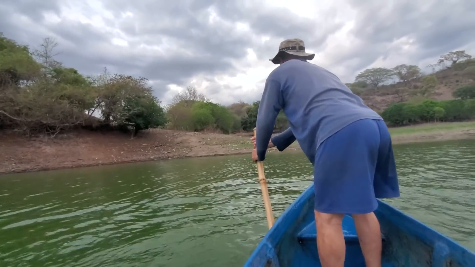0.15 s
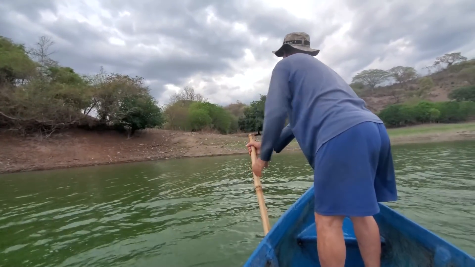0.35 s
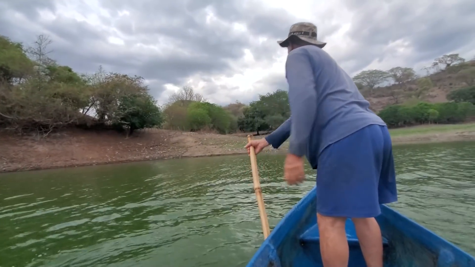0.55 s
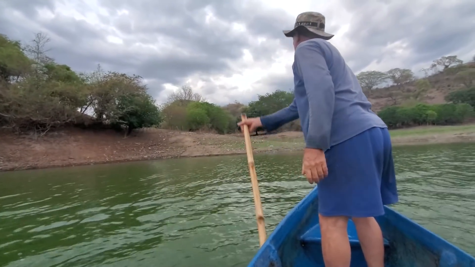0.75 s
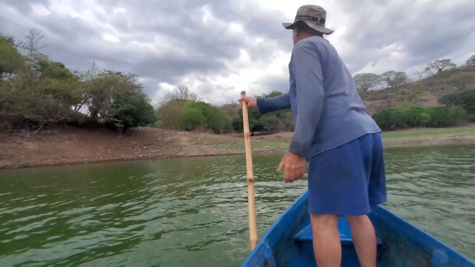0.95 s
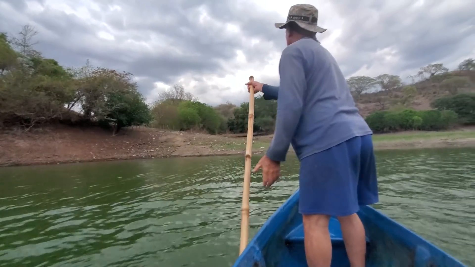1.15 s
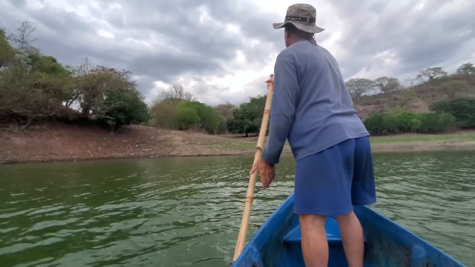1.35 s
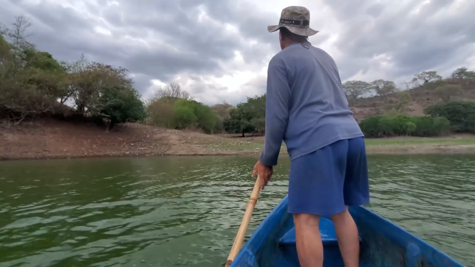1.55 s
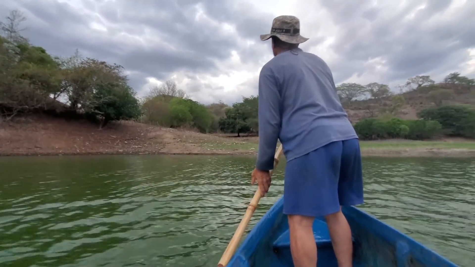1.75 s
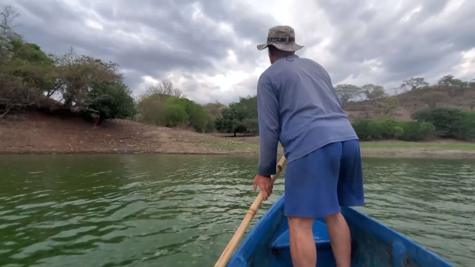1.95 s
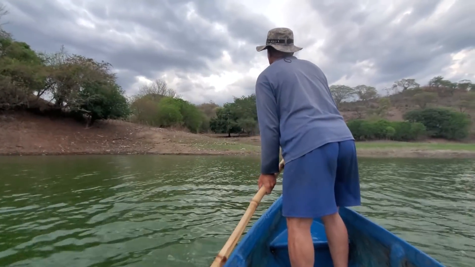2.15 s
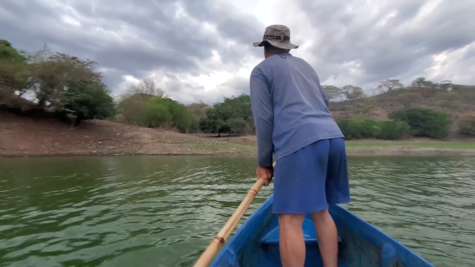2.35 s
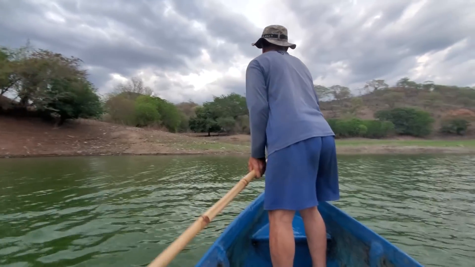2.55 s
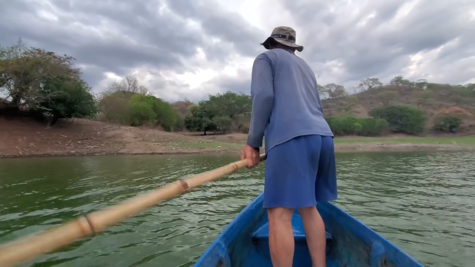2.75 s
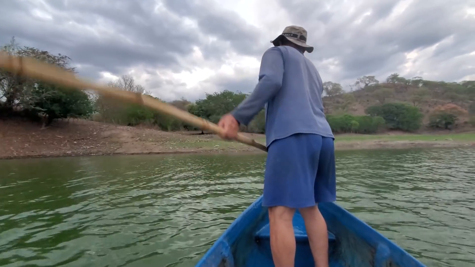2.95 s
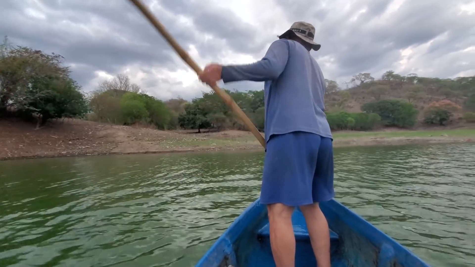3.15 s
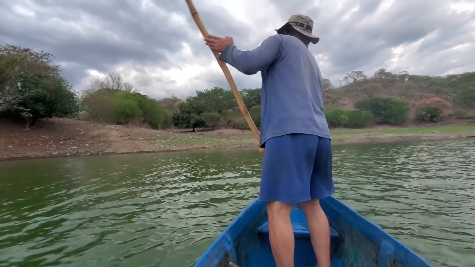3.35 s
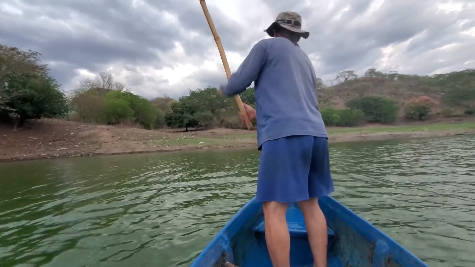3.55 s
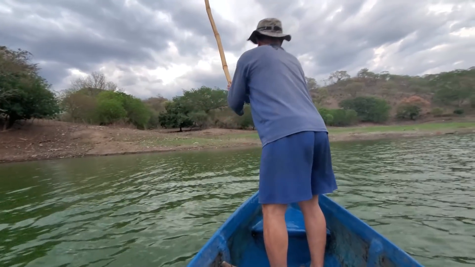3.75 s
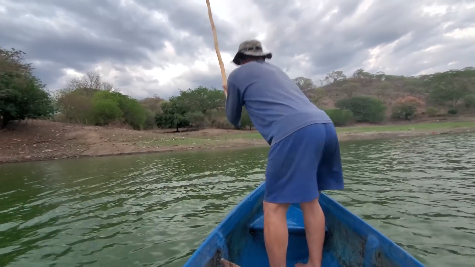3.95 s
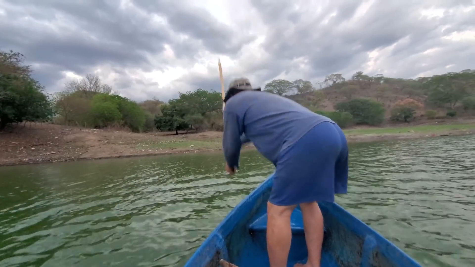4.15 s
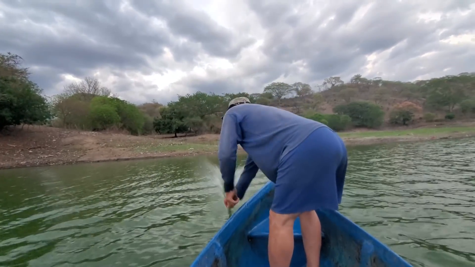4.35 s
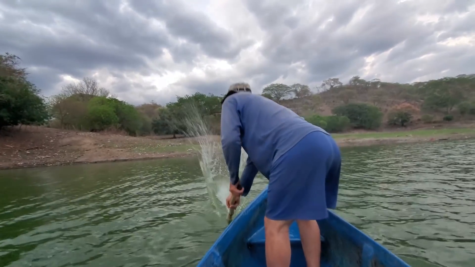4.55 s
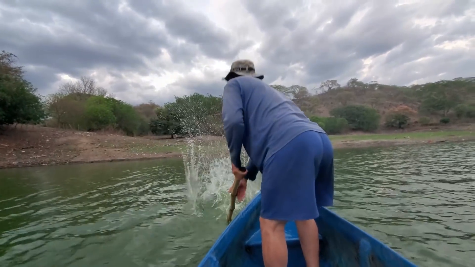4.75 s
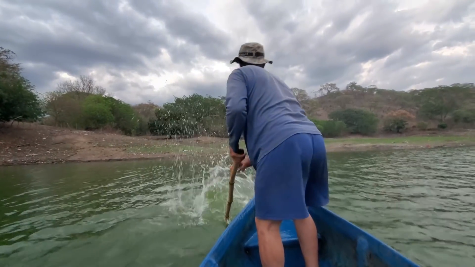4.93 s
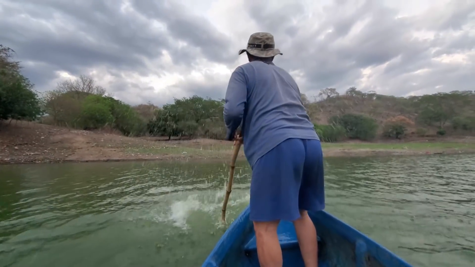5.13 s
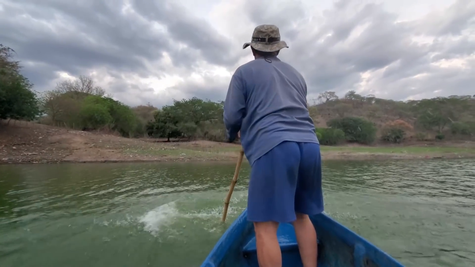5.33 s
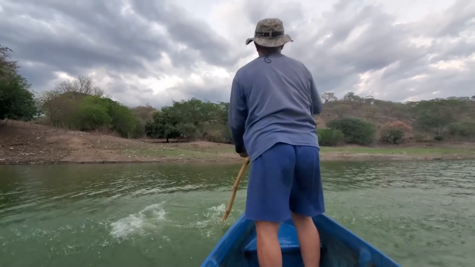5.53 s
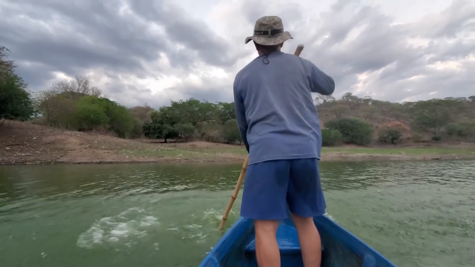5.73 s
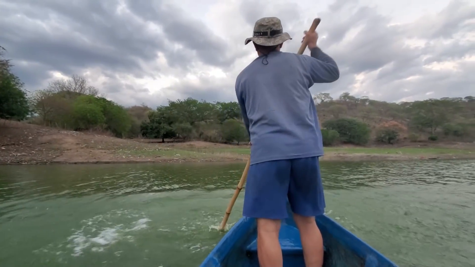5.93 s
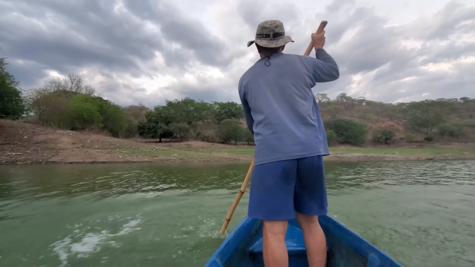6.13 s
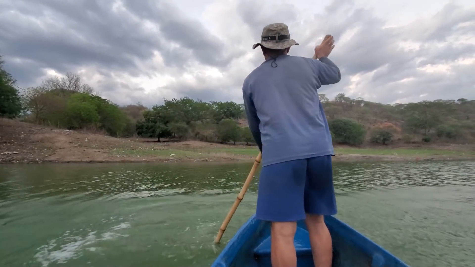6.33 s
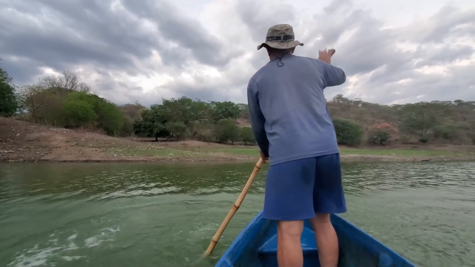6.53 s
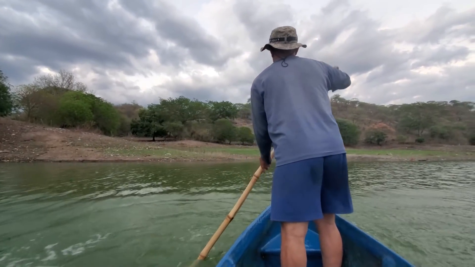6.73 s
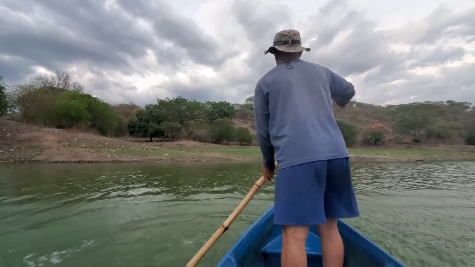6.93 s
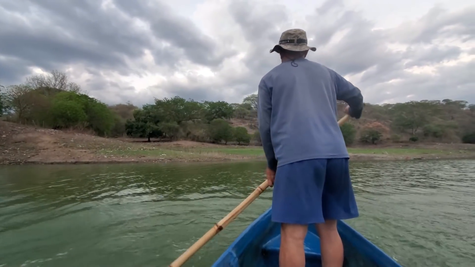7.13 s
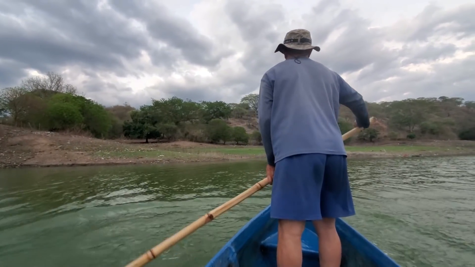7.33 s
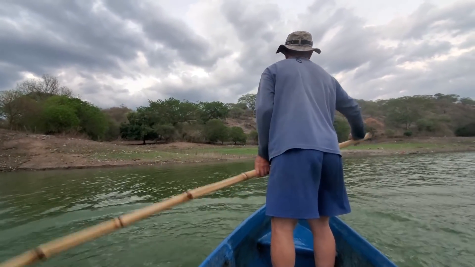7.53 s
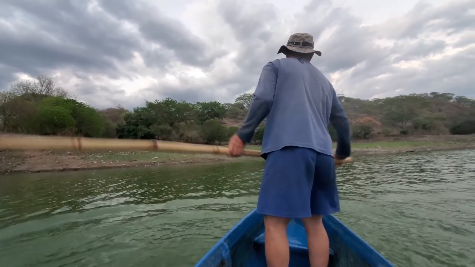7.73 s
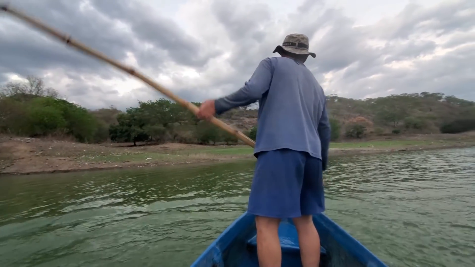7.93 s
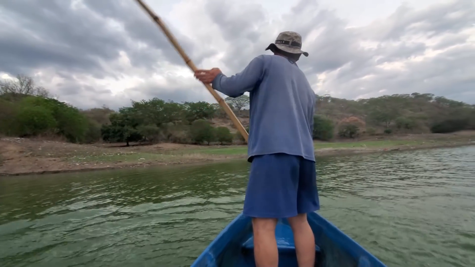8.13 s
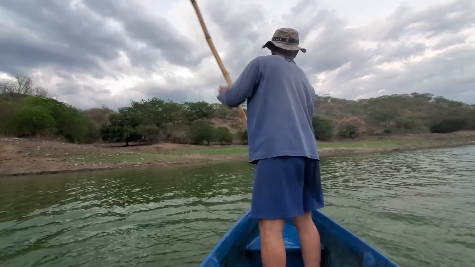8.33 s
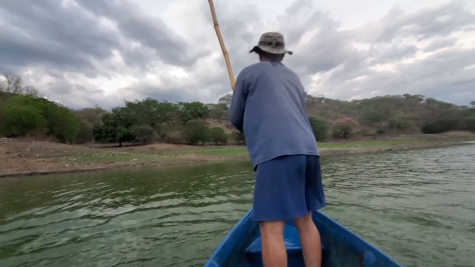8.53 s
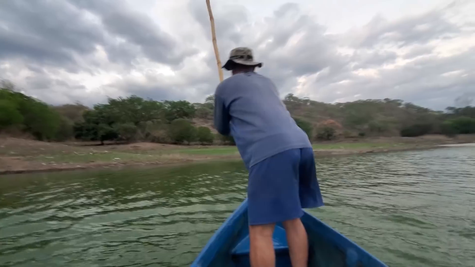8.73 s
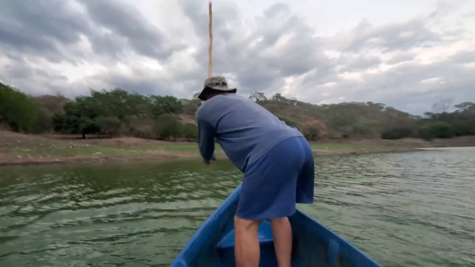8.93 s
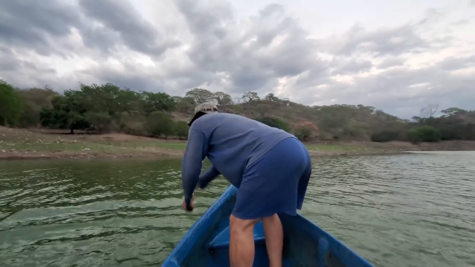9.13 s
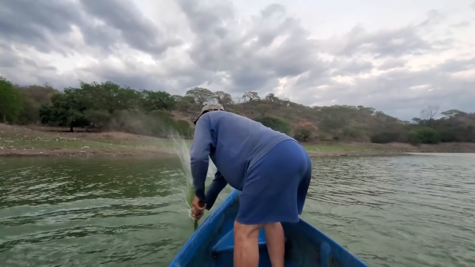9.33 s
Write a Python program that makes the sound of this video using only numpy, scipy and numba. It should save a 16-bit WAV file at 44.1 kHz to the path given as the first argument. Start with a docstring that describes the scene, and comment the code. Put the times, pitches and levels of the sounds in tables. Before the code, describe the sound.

Outdoors, near the bow of a boat: hollow knocks and short rasping scrapes first, then a gush of water running off a lifted pole, thinning to drips. A loud flat smack hits the water, a low plop follows, and a shower of droplets falls ahead. Quiet lapping, brief low wind buffets and another streaming lift lead to a final smack. Thin insect hiss and a faint whine lie beneath.

```python
"""A long bamboo pole, swung by a man in the bow of a small boat, beats the water of a lake.
It bumps and scrapes along the hull as damped modes, comes out streaming as a cloud of ringing bubbles,
and slaps down: a modal crack, the falling pitch and gulp of the cavity, then a shower of bubbles.
Wavelets cluck at the boat as tone bursts with trapped air; insects and wind are coloured noise,
a distant bird and a thin whine are gliding sines."""
import sys
import numpy as np
from scipy import signal
from scipy.fft import rfft, irfft, next_fast_len
from scipy.io import wavfile
from scipy.ndimage import uniform_filter1d
from numba import njit

SR = 44100
rng = np.random.default_rng(int(sys.argv[2]) if len(sys.argv) > 2 else 0)


def bounce(signal):
    """Save signal as a 16-bit WAV file at the path given by the first command-line argument."""
    frames = np.transpose(np.atleast_2d(signal))
    limited = np.clip(frames, -1, 1)
    pcm = np.round(limited * 32767).astype(np.int16)
    wavfile.write(sys.argv[1], SR, pcm)


N = 413658
TIME = np.arange(N) / SR   # t/s
EDGES = np.geomspace(45, 16000, 23)   # band limits f/Hz
BANK = [(low, high, signal.butter(2, [low, high], "band", fs=SR, output="sos"))
        for low, high in zip(EDGES, EDGES[1:])]

# likeness of diffuse sound at left and right: [f/Hz, correlation]
LIKENESS = [(40, 1), (130, 0.97), (600, 0.75), (1400, 0.26), (3000, 0.044), (16000, 0.46)]
# likeness of falling water at left and right: [f/Hz, shared fraction of power]
WATER_LIKENESS = [(500, 1), (1500, 0.97), (2500, 0.75), (4500, 0.15), (12000, 0.23)]

# insects on the shore: [t/s, level/dB]
INSECTS = [(0, -45.5), (1.2, -45), (2.4, -47), (3.8, -47.5), (4.6, -50), (6.3, -57), (6.9, -59),
           (7.3, -54.5), (8.0, -53), (8.6, -53.5), (9.38, -52.5)]
# spectrum of the insects: [f/Hz, level/dB]
INSECT_COLOUR = [(4400, -88), (5300, -17), (6200, -1.5), (7200, -2.5), (7800, 4), (8500, 0), (9700, 2.5),
                 (10800, -7), (13000, -10), (15500, -17)]
# one insect sings out in a narrow band
SINGER_S, SINGER_HOLD_S, SINGER_DB, SINGER_HZ = 7.12, 0.29, -57, 9100
# spectrum of still air: [f/Hz, level/dB]
AIR_COLOUR = [(25, -37), (50, 11.5), (100, -1), (220, -8.5), (550, -2), (1000, -8), (1400, 4), (2100, -9),
              (3500, -11), (5000, -14), (12000, -11), (16000, -8)]
# gusts on the microphone: [t/s at full strength, hold/s, level/dB]
GUSTS = [(5.66, 0.01, -36.5), (6.003, 0.023, -38.5), (8.71, 0.015, -45), (8.82, 0.025, -30),
         (9.045, 0.31, -36)]
# spectrum of the gusts: [f/Hz, level/dB]
GUST_COLOUR = [(20, 8.5), (45, 20), (90, 15.5), (130, -6), (190, -15), (400, -41.5)]
GUST_RISE_DB_PER_S, GUST_FALL_DB_PER_S = 245, 156

# mean pitch of a thin whine: [t/s, f/Hz]
WHINE_PITCH = [(0, 1725), (2.4, 1720), (4, 1685), (6.6, 1691), (9.38, 1680)]
WHINE_DB, WHINE_HISS_DB, WHINE_WANDER_HZ = -61.5, -61.5, 7

# loudest clucks at the hull and under the pole:
# [t/s, level/dB before a 7.5 dB cut, f/Hz, left minus right level/dB, left lead/ms, pat re bubble level/dB]
LAPS = [(0.131, -32, 1616, -5, -0.013, 0), (0.185, -35.5, 2230, -7, -0.15, 4),
        (0.247, -37, 1850, -19, -.1, -4), (0.29, -41, 1260, -5, -0.18, -3),
        (0.49, -31, 684, -4, -0.11, 7.5), (0.535, -39, 525, -1, -0.5, 11),
        (2.523, -39, 2790, 13, 0.32, -15), (2.607, -31, 1010, 0, 0.18, 8),
        (2.621, -21.5, 1360, -5, 0.37, -1), (2.676, -22, 2260, -2, 0.36, -17),
        (2.697, -23, 2550, -3, 0.48, 2), (2.716, -24, 3940, 9, .38, -3), (2.727, -19.5, 2220, -3, 0.33, -7),
        (2.741, -22.5, 2430, -2, 0.31, 4), (2.852, -25, 2650, -1, 0.42, 0),
        (2.92, -26.5, 1370, -1, 0.27, -7), (3.109, -36, 2680, -1, 0.36, -17),
        (3.171, -31, 2600, -3, .37, -18), (3.379, -34.5, 800, -17, -0.26, 1),
        (3.441, -33.5, 1580, -8, -0.47, 4), (3.591, -36.5, 1690, -7, -0.18, 9),
        (3.885, -29, 1825, -7, -0.11, -6), (3.97, -43, 1550, -7, -0.11, 2),
        (4.08, -49, 1000, -10, -0.058, 5), (4.137, -45, 1750, -5, -0.021, -3),
        (4.163, -49, 2420, -3, -.1, -6), (4.478, -20, 1340, -1, -0.0097, -2),
        (4.504, -28, 914, -3, -0.022, 0), (4.522, -30, 1390, -5, -0.037, -8),
        (4.541, -28, 1133, 0, -0.045, -4), (4.587, -34, 880, -1, 0, 5), (4.706, -34, 1380, 1, 0.052, -3),
        (4.74, -35.5, 1900, -2, 0.057, -5), (4.956, -20, 1110, -4, -0.0078, -7),
        (5.638, -38, 1920, -9, 0.33, 6), (5.81, -45, 1470, -4, .1, -6), (5.876, -33.5, 1460, -6, 0.12, 14),
        (6.02, -35, 1510, -13, 0.18, -4), (6.037, -30.5, 740, -3, 0.1, 11),
        (6.315, -32.5, 1310, -2, -0.12, -3), (6.373, -36.5, 1660, -5, -0.09, -7),
        (6.625, -42.5, 880, -3, -0.18, 6), (6.679, -43, 1190, -4, -0.3, -5),
        (6.703, -31.5, 1510, -15, -0.4, -4), (6.777, -35.5, 870, -6, -0.11, 5),
        (6.854, -36, 620, -5, -0.4, 4), (6.855, -33, 2370, -3, -0.12, -5),
        (7.103, -36, 507, -5, -0.051, 12), (7.195, -36, 1640, -4, 0.11, -5), (7.26, -38, 520, -4, 0.19, -7),
        (7.3, -39, 2580, 5, 0.29, 0), (7.352, -30, 960, -6, 0.28, 2), (7.443, -28.5, 1216, -9, 0.26, -5),
        (7.475, -25, 1960, -5, 0.23, 5), (7.713, -26.5, 2030, -6, 0.31, -16),
        (7.787, -28, 1860, -7, 0.4, -16), (7.869, -27, 1750, -6, 0.42, -15),
        (7.910, -29, 2400, -3, 0.54, -9), (8.097, -34, 2225, -5, .44, -16),
        (8.219, -29.5, 1880, -5, 0.4, -5), (8.292, -29.5, 2610, 4, 0.45, -28),
        (8.456, -33.5, 1196, -1, 0.15, -7), (8.968, -33, 776, -4, -0.15, -1)]
# spectrum of a pat, before it is narrowed around the pitch: [f/Hz, level/dB]
LAP_COLOUR = [(100, -33), (300, -23), (600, -1.5), (1000, -4.5), (1400, 4.5), (2300, -3.5), (3300, -21),
              (6000, -7), (16000, -44)]
# decay of a pat: [f/Hz, T60/s]
LAP_T60 = [(300, 0.16), (700, 0.34), (1500, 0.092), (3000, 0.19), (10000, .03)]
# the boat rocks, and smaller wavelets come by chance, from the right: [start t/s, end t/s]
ROCKING = [(0.081, 0.42), (2.25, 3.2), (3.401, 4.3), (6.45, 9), (6.999, 7.42), (8.1, 9.0)]
RIPPLE_DB, RIPPLE_SPREAD_DB, RIPPLE_PAT_DB = -42, 1.5, 0.5   # the first before the same 7.5 dB cut
RIPPLE_PAN_DB, RIPPLE_LEAD_MS, RIPPLE_LOW_HZ, RIPPLE_HIGH_HZ = -13, -0.28, 500, 2430

# big air pockets: [t/s, level/dB, start f/Hz, T60/s, glide/(octaves per s), left lead/ms]
POCKETS = [(0.374, -52, 590, 0.08, -0.5, -0.3), (0.442, -48.5, 494, 0.11, 13.5, -0.26),
           (0.54, -41.5, 506, 0.093, 2, -0.035), (2.575, -44, 760, 0.058, 17, 0.16),
           (2.785, -31, 594, 0.18, 7, 0.41), (2.85, -39.5, 602, 0.088, 5, 0.33),
           (2.987, -38.5, 870, 0.099, 3, 0.27), (3.044, -40, 924, 0.053, 6, 0.22),
           (3.184, -46, 650, 0.089, 2, .27), (3.378, -37, 615, 0.031, 17, -0.27),
           (3.455, -43, 656, 0.053, 11, -0.3), (3.484, -47, 755, 0.099, 6, -0.16),
           (3.671, -44.5, 621, 0.22, 7.5, 0), (3.755, -47, 525, 0.11, 7.5, 0.19),
           (4.175, -42, 234, 0.16, 32, 0), (4.491, -29.5, 468, 0.026, 10, 0.067),
           (4.498, -15.5, 108.6, 0.13, 2, 0.073), (4.526, -32, 148, 0.055, 4.5, -0.088),
           (4.528, -27.5, 217, 0.084, 0, -0.041), (4.541, -36, 337, 0.074, -2, 0),
           (4.561, -43, 129, 0.24, -3.5, -0.045), (4.753, -35, 194, 0.085, 4.5, 0.054),
           (5.062, -31, 660, 0.096, 26, 0.025), (5.642, -38, 786, 0.09, 3, 0.085),
           (6.532, -50, 562, 0.19, -4, -0.04), (6.622, -47.5, 610, 0.081, 11.5, 0),
           (6.905, -38.5, 764, 0.044, 12, -0.24), (7.01, -42.5, 484, 0.094, -2, 0),
           (7.048, -43, 459, 0.2, 1, 0.14), (7.378, -35, 780, 0.088, 30.5, 0.24),
           (7.458, -34, 759, 0.061, 38.5, 0.16), (7.492, -35.5, 767, .08, 15, 0.039),
           (7.525, -37, 660, 0.079, 5, 0.2), (7.612, -42.5, 409, 0.2, 4.5, 0.34),
           (7.632, -33, 754, 0.12, 2, .3), (7.66, -35, 655, 0.11, 3, 0.4),
           (7.693, -35, 634, 0.043, -1, 0.37), (8.0, -42, 720, 0.047, 6, 0.36),
           (8.071, -46.5, 323, 0.22, 23, -.1), (8.398, -43, 311, 0.17, 2, 0),
           (8.435, -47.5, 455, 0.078, 5, -.1), (8.472, -46.5, 326, 0.12, -1, 0),
           (8.49, -46, 620, 0.11, 8, -0.059)]
# the further a pocket glides, the more slowly it swells
POCKET_SWELL_S, SWELL_S_PER_OCTAVE = 0.0019, 0.0016

# pole and feet bumping the hull: [t/s, level/dB, treble re bass level/dB, ring length factor]
KNOCKS = [(0.7039, -15, 16, 0.96), (0.7105, -21, 6, 1.6), (0.731, -23, -9, 0.8), (0.7698, -21.5, 19, 1.3),
          (0.791, -22.5, 0, 0.7), (0.846, -30.5, -36, 1.1), (1.008, -24.5, -12, 0.87),
          (1.0303, -15, 3, 0.83), (1.0362, -18, -5.5, 0.91), (1.062, -30.5, -17, 1.1),
          (1.447, -37.5, -4, 1.26), (2.024, -30.5, -8, 1.64), (2.169, -33.5, -6.5, 1.43),
          (4.722, -36.5, 4, 2.8), (6.7034, -40.5, 25, 0.16), (7.493, -54, -22, 1.1), (8.199, -40, -1, 0.59),
          (8.2181, -36, 5, 0.96)]
# spectrum of a bump, before its treble tilt: [f/Hz, level/dB]
KNOCK_COLOUR = [(26, -35), (45, -5), (70, 2.5), (226, -0.5), (321, -4.5), (369, 12), (455, -9), (488, -6),
                (536, -7), (855, -10.5), (1110, -17), (1720, -17.5), (3910, -48.5), (7880, -51),
                (12000, -52), (15600, -89), (22000, -120)]
# decay of a bump, before its length factor: [f/Hz, T60/s]
KNOCK_T60 = [(70, 0.4), (200, 0.13), (500, 0.27), (1200, 0.15), (3000, 0.072), (10000, 0.14)]
# modes of the bamboo tube: [f/Hz, bandwidth/Hz, level/dB]
RASP_MODES = [(713, 91, 3), (1353, 150, 1.5), (1845, 166, -3), (2840, 660, -15), (5220, 580, -12.5)]
# modes of the hull: [f/Hz, level/dB, T60/s]
HULL_MODES = [(87.2, -4, 0.36), (120.7, -1.5, 0.31), (169.4, 1.5, 0.2), (225.6, -2, 0.29),
              (270.5, -4.5, 0.41), (356.3, -1.5, 0.24), (406.5, -5.5, 0.18), (486, -5.5, 0.14),
              (696, 4.5, 0.086), (1124, -7, 0.11), (1334, 0, 0.058), (1585, 8.5, 0.065), (1690, 7.5, 0.055),
              (2000, 4, 0.078), (2900, -4, 0.028)]
# a bump rings the hull mostly below the first (shifted by its tilt), a slap above the second
KNOCK_SOFT_HZ, SLAP_THIN_HZ = 795, 457

# the pole slides along the side: [t/s at full strength, hold/s, hull rumble level/dB, rasp level/dB]
SCRAPES = [(0.767, 0.19, -48.5, -39.5), (1.106, 0.062, -45.5, -42), (1.265, 0.026, -50, -46),
           (1.386, 0.06, -56, -60.5), (1.728, 0.14, -42.5, -56)]
# spectrum of the hull's rumble: [f/Hz, level/dB]
RUMBLE_COLOUR = [(26, -34), (45, -6), (124, 1), (264, -2.5), (303, -5.5), (390, -2.5), (485, -12.5),
                 (700, -6.5), (910, -26), (1540, -120)]
SCRAPE_RISE_DB_PER_S, SCRAPE_FALL_DB_PER_S = 276, 94

# the pole lifts out and water streams off it; levels before a common 2 dB cut: [t/s, length/s,
# gurgle level/dB, bubble level/dB, spray level/dB, hold factor, left lead/ms, left minus right level/dB]
LIFTS = [(2.6, .83, -36.5, -39.5, -38, 1.39, 0.342, 2.5), (7.48, .75, -35.5, -39.5, -39, 1.48, 0.398, 2.5)]
# course of gurgle, bubbles, spray (a row each): [delay/s, hold/s before the hold factor, rise/(dB/s), fade/(dB/s)]
STREAM_COURSE = [(.005, 0.09, 65, 53), (0.015, 0.202, 147, 30), (0.016, .33, 150, 29.5)]
# spectrum of the streaming water: [f/Hz, level/dB]
STREAM_COLOUR = [(88, -57), (150, -21), (240, -19), (341, -14.5), (524, -22), (790, -0.5), (950, -8.5),
                 (1200, 3), (1450, 3.5), (1750, 5.5), (2300, 2), (3620, -4), (7040, -9), (15100, -5.5),
                 (16000, -15)]
DRIPS_PER_S, STREAM_FOAM_DB = 2600, 2   # nominal rate, scaled by flow and drop size
ONSET_DB_PER_S, DRY_UP_DB_PER_S = 240, 38   # how fast a fall of water sets in and stops

# thin trickles as the pole goes in, turns, starts to rise and drains:
# [t/s at full strength, hold/s, level/dB, rise/(dB/s)]
TRICKLES = [(2.614, 0.024, -52, 127), (3.234, 0.26, -51.5, 90), (4.38, 0.26, -53.5, 300),
            (5.907, 0.22, -49, 73), (6.707, 0.26, -59, 120), (7.437, 0.038, -43, 72), (8.07, 0.27, -56, 90)]
TRICKLE_FALL_DB_PER_S = 112

# single drops landing close by: [t/s, level/dB before a 7.5 dB cut, centre f/Hz]
DROPS = [(2.718, -24.5, 9800), (2.7808, -30, 13000), (2.8353, -27, 9300), (3.2192, -31, 9350),
         (3.3181, -34, 12000), (3.4687, -30.5, 8200), (3.5411, -39, 9270), (4.9615, -20.5, 11800),
         (5.2326, -22.5, 9100), (5.4156, -29, 3920), (5.5977, -28, 13300), (5.6391, -29, 3650),
         (5.668, -26, 12400), (5.7089, -26, 13500), (5.7398, -32, 13000), (5.763, -32, 12100),
         (5.7832, -32, 13600), (5.826, -31, 12300), (5.887, -28, 12000), (5.901, -34, 12500),
         (5.9484, -43, 12600), (5.9923, -32.5, 13600), (6.3225, -40, 10100), (6.49, -41, 5000),
         (6.812, -35, 11400), (7.418, -34, 11200), (7.4754, -38, 11500), (7.4916, -17.5, 10400),
         (7.5842, -41, 12500), (7.6765, -30, 10500), (7.9858, -30.5, 9570), (8.2212, -35, 13500),
         (8.293, -29.5, 13000), (8.5315, -43, 9500), (8.884, -36, 6800)]

# eddies churning round the submerged pole: [t/s at their height, level/dB]
SWIRLS = [(3.85, -62.5), (4.15, -65.5), (5.29, -40.5), (7.119, -54.5), (7.329, -55), (7.62, -65),
          (7.93, -63)]
# spectrum of the large bubbles in the eddies: [f/Hz, level/dB]
SWIRL_COLOUR = [(100, -4), (160, 9), (220, -5.5), (330, 7.5), (450, 0.5)]
SWIRL_RISE_DB_PER_S, SWIRL_FALL_DB_PER_S = 68, 68

# a bird far off on the shore: [t/s, length/s, highest f/Hz, level/dB]
WHISTLES = [(3.93, 0.29, 2670, -72.5), (8.614, 0.25, 2650, -73)]

# pole slapping the lake: [t/s, level/dB, trapped air f/Hz, left lead/ms]
SLAPS = [(4.3405, -17, 3000, 0.058), (4.3425, -9.5, 1360, .1), (4.3432, -17, 740, 0.042),
         (9.2446, -9, 815, 0.18), (9.2490, -13.5, 1780, 0.19)]
# spectrum of the slap: [f/Hz, level/dB]
SLAP_COLOUR = [(59, -32), (100, 0), (416, -20), (482, -18), (570, -42), (718, 3.5), (1050, -13), (1290, 1),
               (1460, 14), (1730, -2), (2750, -23.5), (3390, -12.5), (9260, -29), (11900, -18),
               (15000, -53)]
# decay of the slap: [f/Hz, T60/s]
SLAP_T60 = [(150, 0.026), (600, 0.1), (1300, 0.056), (3000, 0.081), (6000, 0.067), (12000, 0.16)]
SLAP_PAN_DB = -5   # left minus right
# the cavity behind the pole closes: [t/s, level/dB]
GULPS = [(4.470, -27), (9.369, -31)]
# spectrum of the gulp: [f/Hz, level/dB]
GULP_COLOUR = [(180, -1.5), (300, -16), (507, 2), (669, -12), (884, -16), (1330, -1.5), (1760, -14),
               (1970, -6), (2170, -20), (2820, -19), (4690, -18), (6620, -36), (15000, -28)]
GULP_SPIT_DB = -40   # a little spray follows, swelling more slowly
REBOUND_S, REBOUND_LOSS_DB = 0.032, 6.5   # the cavity walls meet again and again, weaker each time
# the slap opens a hollow in the water: [t/s, level/dB, start f/Hz, T60/s]
CAVITIES = [(4.343, -28, 832, 0.16), (9.245, -25.5, 686, 0.19)]
CAVITY_OPEN_HZ, CAVITY_WIDENS_S = 466, 0.0153
# sharp snaps of water from the slap: [t/s, level/dB before a 7.5 dB cut, centre f/Hz]
SNAPS = [(4.3461, -8, 11700), (9.2477, -7.5, 13700), (9.25, -11, 10800)]

# the water thrown up by the slap rains back; the rate is nominal, the levels before a 2 dB cut
SHOWER_S, SHOWER_LENGTH_S, SHOWER_DROPS_PER_S = 4.72, 1.25, 5400
# levels of the shower: [gurgle level/dB, bubble level/dB, spray level/dB]
SHOWER_DB = (-33.5, -31, -32)
# course of gurgle, bubbles, spray (a row each): [delay/s, hold/s, rise/(dB/s), fade/(dB/s)]
SHOWER_COURSE = [(0.37, 0.043, 36, 26), (0.28, .13, 44, 19), (0.29, 0.19, 57, 19)]
# spectrum of the shower: [f/Hz, level/dB]
SHOWER_COLOUR = [(53, -47), (90, -29), (155, -22), (272, -10.5), (385, -8), (438, -11.5), (661, -2),
                 (998, -6.5), (1350, 2.5), (2230, -10), (2650, -9), (5530, -9.5), (6870, -14.5),
                 (15000, -10), (16000, -27)]
SHOWER_FOAM_DB, SHOWER_PLINK_DB = 5, -17
FOAM_POPS_PER_S, FOAM_DB, FOAM_S = 45, -60.5, 1.45   # foam fizzing after the shower

CUTOFF_HZ = 16100


def from_db(db):
    """Logarithmic level: decibels to amplitude gain."""
    return 10 ** (np.asarray(db) / 20)


def rms_one(x):
    """Normalisation to unit mean power."""
    return x / np.sqrt(np.mean(x ** 2) + 1e-20)


def peak_one(x, size=176):
    """Normalisation of short-time power: the loudest 4 ms get unit power."""
    power = uniform_filter1d(np.atleast_2d(x) ** 2, size, mode="constant").mean(0)
    return x / np.sqrt(power.max() + 1e-20)


def at_hz(points, hz):
    """Interpolation of a table on a logarithmic frequency axis."""
    f, value = np.transpose(points)
    return np.interp(np.log(np.maximum(hz, 1)), np.log(f), value)


def panned(pan_db):
    """Interaural level difference: left and right gains of unit mean power, positive to the left."""
    return rms_one(from_db([[pan_db / 2], [-pan_db / 2]]))


def left_leads(sound, lead_ms):
    """Interaural time difference: the right channel later, or earlier for a negative lead."""
    i = np.arange(sound.shape[-1])
    return np.array([sound[0], np.interp(i - lead_ms * SR / 1000, i, sound[1], left=0)])


def add(out, s, sound):
    """Superposition of a sound from time s."""
    i = int(np.clip(round(s * SR), 0, N - 1))
    out[:, i:i + sound.shape[-1]] += sound[..., :N - i]


def drift(rate):
    """Random modulation: straight lines between normal values of spread 1, `rate` of them a second."""
    return np.interp(TIME * rate, np.arange(4096), rng.standard_normal(4096))


def swell(s, hold_s, rise_db_per_s, fall_db_per_s):
    """Exponential growth and decay: a gain that climbs to 1 at time s, holds and dies away."""
    before, after = np.maximum(s - TIME, 0), np.maximum(TIME - s - hold_s, 0)
    return from_db(-rise_db_per_s * before - fall_db_per_s * after)


def band(x, low_hz, high_hz):
    """Band-pass filtering by a Butterworth resonator."""
    sos = signal.butter(2, [low_hz, min(high_hz, .47 * SR)], "band", fs=SR, output="sos")
    return signal.sosfilt(sos, x)


def colour(x, spectrum):
    """Spectral shaping by multiplication in the frequency domain."""
    size = next_fast_len(N, True)
    gain = from_db(at_hz(spectrum, np.fft.rfftfreq(size, 1 / SR)))
    return irfft(rfft(x, size) * gain, size)[..., :N]


def pair(alike, size=N):
    """Partial coherence: white noise at two microphones with a given correlation."""
    mid, side = rng.standard_normal((2, size))
    return np.sqrt((1 + alike) / 2) * mid + np.sqrt((1 - alike) / 2) * side * [[1], [-1]]


def burst(spectrum, t60s, tilt_db=0, length=1, size=26000, attack_s=0.0001):
    """Dense modal response to a blow: every band swells at once and dies at its own pace."""
    t, out = TIME[:size], 0
    attack = 1 - np.exp(-(t / attack_s) ** 2)
    for low, high, sos in BANK:
        hz = np.sqrt(low * high)
        decay = from_db(-60 * t / (at_hz(t60s, hz) * length))
        rung = signal.sosfilt(sos, pair(at_hz(LIKENESS, hz), size) * attack * decay)
        treble = hz ** 2 / (hz ** 2 + 600 ** 2)
        gain = np.sqrt(high - low) * from_db(at_hz(spectrum, hz) + tilt_db * treble)
        out = out + rung / rung.std(axis=1, keepdims=True) * gain
    return peak_one(out)


def bubble(hz, t60, rise, attack_s):
    """Volume resonance of trapped air: a damped sine gliding by `rise` octaves a second, at most two up."""
    t = np.arange(int((t60 + 3 * attack_s) * SR)) / SR
    pitch = np.minimum(hz * 2 ** np.minimum(rise * t, 2), SR / 2)
    tone = np.sin(2 * np.pi * np.cumsum(pitch) / SR)
    return tone * from_db(-60 * t / t60) * (1 - np.exp(-(t / attack_s) ** 2))


@njit
def ring_all(start, hz, size, lead, pan, cycles, rise, n):
    """Superposition of small bubbles: damped, rising sines reaching the two microphones at different times."""
    out = np.zeros((2, n))
    for k in range(len(start)):
        life = cycles[k] / hz[k] * SR
        for ch in range(2):
            onset = start[k] * SR + ch * lead[k] * SR
            gain = size[k] * pan[k] ** (1 - 2 * ch)
            for i in range(max(int(onset) + 1, 0), min(int(onset + life), n)):
                age = (i - onset) / life
                phase = 2 * np.pi * cycles[k] * age * (1 + rise * age)
                out[ch, i] += gain * np.exp(-6.9 * age) * np.sin(phase)
    return out


def grains(span, per_s, low_hz, high_hz, cycles, spread_db, lead_ms, scatter_ms=0.12, rise=0.15, count=16000):
    """Random superposition of up to `count` bubbles with an even spectrum; per_s may follow time."""
    when, pitch, keep, life = rng.random((count, 4)).T
    loud, place, side = rng.standard_normal((count, 3)).T
    length_s = span[1] - span[0]
    start = span[0] + when * length_s
    rate = np.interp(start, TIME, per_s * np.ones(N))
    on = keep < rate * length_s / count
    hz = low_hz * (high_hz / low_hz) ** pitch
    size = from_db(spread_db * np.clip(loud, -2, 2)) * hz / low_hz / np.sqrt(rate)
    lead = (lead_ms + scatter_ms * place) / 1000
    pan = from_db(1.5 * side)
    cycles = cycles * (.5 + life)
    cloud = ring_all(start[on], hz[on], size[on], lead[on], pan[on], cycles[on], float(rise), N)
    return rms_one(cloud) * np.sqrt(length_s * SR / N)   # unit power within the span


def surroundings():
    """Broadband noise sources: shrill insects, still air and gusts on the microphone."""
    insect_gain = from_db(np.interp(TIME, *np.transpose(INSECTS)))
    insects = insect_gain * rms_one(colour(pair(alike=0.0083), INSECT_COLOUR)) * panned(pan_db=6.0)
    narrow = rms_one(band(pair(alike=0.1), SINGER_HZ / 1.06, SINGER_HZ * 1.03))
    singer = from_db(SINGER_DB) * swell(SINGER_S, SINGER_HOLD_S, 35, 25) * narrow
    air = from_db(-60.5) * rms_one(colour(pair(alike=0.49), AIR_COLOUR))
    gusts = sum(from_db(db) * swell(s, hold, GUST_RISE_DB_PER_S, GUST_FALL_DB_PER_S)
                for s, hold, db in GUSTS)
    rush = rms_one(colour(pair(alike=0.11), GUST_COLOUR))
    wind = gusts * from_db(3.2 * drift(rate=22)) * rush * panned(pan_db=-9.5)
    return insects + singer + air + wind


def whine():
    """Frequency and amplitude modulation: a thin tone wanders a little within a narrow band of hiss."""
    pitch = np.interp(TIME, *np.transpose(WHINE_PITCH)) + WHINE_WANDER_HZ * drift(rate=14)
    tone = np.sqrt(2) * np.sin(2 * np.pi * np.cumsum(pitch) / SR) * from_db(2.4 * drift(rate=5))
    spectrum = [(1350, -26), (1590, -8), (1720, 1.5), (1850, -17), (2100, -19), (2500, -39)]
    hiss = rms_one(colour(pair(alike=0.1), spectrum))
    both = left_leads(np.array([tone, tone]), lead_ms=0.18)
    return from_db(WHINE_DB) * both + from_db(WHINE_HISS_DB) * hiss


def cluck(hz, lead_ms, pat_db, cluster_s=0.017, count=3, size=7000):
    """Impact and air entrainment: a wavelet pats the hull, or a gob the lake, and traps a few bubbles."""
    out = np.zeros((2, 2 * size))
    spectrum = [(f, level - 4 * abs(np.log2(f / hz))) for f, level in LAP_COLOUR]
    add(out, 0, from_db(pat_db) * burst(spectrum, LAP_T60, size=size, attack_s=0.00062))
    for k, (late, pitch, weak) in enumerate(rng.random((count, 3))):
        later = k > 0   # the first bubble is the loudest and nearest the given pitch
        f = hz * 2 ** ((2 * pitch - 1) * (.7 if later else .04))
        gain = from_db(10.0 - (6.5 + 6.3 * weak) * later)
        add(out, cluster_s * late * later, gain * bubble(f, t60=min(60 / f, .07), rise=6.6, attack_s=0.00063))
    return peak_one(left_leads(out, lead_ms))


def lapping(count=5):
    """Entrained air at the hull: big clucks, small ones by chance, and a murmur of the tiniest."""
    out = np.zeros((2, N))
    wavelets = list(LAPS)
    for start, end in ROCKING:
        for k, (when, loud, pitch) in enumerate(rng.random((count, 3))):
            s = start + (end - start) * (k + when) / count
            db = RIPPLE_DB + RIPPLE_SPREAD_DB * (2 * loud - 1)
            hz = RIPPLE_LOW_HZ * (RIPPLE_HIGH_HZ / RIPPLE_LOW_HZ) ** pitch
            wavelets.append((s, db, hz, RIPPLE_PAN_DB, RIPPLE_LEAD_MS, RIPPLE_PAT_DB))
    for s, db, hz, pan_db, lead_ms, pat_db in wavelets:
        add(out, s, from_db(db - 7.5) * panned(pan_db) * cluck(hz, lead_ms, pat_db))
    murmur = grains((0, N / SR), per_s=140, low_hz=398.0, high_hz=2470, cycles=86, spread_db=0.0,
                    lead_ms=0.27, scatter_ms=0.32, rise=0.13)
    murmur = rms_one(colour(murmur, [(380, -3.0), (600, 3.5), (1500, -8.0), (2800, -4.0)]))
    return out + from_db(-62.5) * murmur * from_db(2.0 * drift(rate=2.86))


def pockets():
    """Volume resonance of large bubbles: pockets of air plop and mostly glide upwards."""
    out = np.zeros((2, N))
    for s, db, hz, t60, rise, lead_ms in POCKETS:
        tone = bubble(hz, t60, rise, POCKET_SWELL_S + SWELL_S_PER_OCTAVE * abs(rise) * t60)
        tone = tone * from_db(4.2 * drift(rate=248)[:len(tone)])   # the pocket is not round and rings unevenly
        add(out, s, from_db(db) * peak_one(left_leads(np.array([tone, tone]), lead_ms)))
    return out


def hull_ring(low_hz, high_hz, size):
    """Modal excitation: the hull's modes, unequally struck by a blow strongest between two frequencies."""
    t, out = TIME[:size], 0
    for hz, level, t60 in HULL_MODES:
        decay = from_db(level + rng.normal(0, 1.0) - 60 * t / t60)
        excitation = 1 / (1 + (low_hz / hz) ** 6) / (1 + (hz / high_hz) ** 2)
        out = out + excitation * decay * np.sin(2 * np.pi * hz * t) * rng.choice([-1, 1])
    return peak_one(out)


def knocks(size=26000):
    """Impulse response of two coupled bodies: the bamboo clacks at contact and the hull booms."""
    out, t = np.zeros((2, N)), TIME[:size]
    clack = 0
    for k, (hz, width, level) in enumerate(RASP_MODES):
        mode = np.exp(-np.pi * width * t) * np.sin(2 * np.pi * hz * t)
        clack = clack + from_db(level) * mode * (-1) ** k
    clack = peak_one(clack)
    for s, db, tilt_db, length in KNOCKS:
        boom = burst(KNOCK_COLOUR, KNOCK_T60, tilt_db, length, size=size)
        soft_hz = KNOCK_SOFT_HZ * from_db(min(tilt_db, 6) / 2)   # softer blows ring lower
        ring = from_db(-2.0) * hull_ring(0, soft_hz, size) * min(length, 1)
        blow = from_db(-2.5) * boom + ring + from_db(-6.5 + min(tilt_db, 3)) * clack
        add(out, s, from_db(db) * blow)
    return out * panned(pan_db=-2.5)


def scrape():
    """Friction excitation: the pole slips unevenly along the side, the bamboo rasps and the hull rumbles."""
    rumble, rasp = sum(from_db([[rumble_db], [rasp_db]])
                       * swell(s, hold, SCRAPE_RISE_DB_PER_S, SCRAPE_FALL_DB_PER_S)
                       for s, hold, rumble_db, rasp_db in SCRAPES)
    slips = pair(alike=0.22) * from_db(1.6 * drift(rate=86))
    tube = 0
    for k, (hz, width, db) in enumerate(RASP_MODES):
        b, a = signal.iirpeak(hz, hz / width, fs=SR)
        tube = tube + from_db(db) * signal.lfilter(b, a, slips) * (-1) ** k
    hull = rms_one(colour(pair(alike=0.9), RUMBLE_COLOUR))
    pressure = from_db(1.8 * drift(rate=26))
    return pressure * (rumble * hull + rasp * rms_one(tube))


def foam_noise(lead_ms):
    """Frequency-dependent coherence: a wash of tiny bubbles from one side, most alike in the bass."""
    size = next_fast_len(N, True)
    hz = np.fft.rfftfreq(size, 1 / SR)
    alike = at_hz(WATER_LIKENESS, hz)
    shared, *own = rfft(rng.standard_normal((3, size)))
    arrival = np.exp(-2j * np.pi * hz * [[0], [lead_ms / 1000]])
    return irfft(np.sqrt(alike) * shared * arrival + np.sqrt(1 - alike) * np.array(own), size)[:, :N]


def falling_water(s, length_s, levels_db, course, spectrum, drops_per_s, lead_ms, pan_db,
                  lowest_hz, foam_db, clump_db, thin_clump_db, plink_db):
    """Air entrainment by drops: their bubbles ring, the mass blends into foam, and a few plink alone."""
    falling = swell(s, length_s, ONSET_DB_PER_S, DRY_UP_DB_PER_S)
    gurgle, fizz, spray = [from_db(db) * falling * swell(s + delay, hold, rise, fade)
                           for db, (delay, hold, rise, fade) in zip(levels_db, course)]
    span = (s - .2, s + length_s + .3)
    inside = (TIME > span[0]) * (TIME < span[1])
    crowding = np.sqrt((span[1] - span[0]) * SR / N)
    flow = fizz / fizz.max()
    rate = drops_per_s * (.12 + flow)
    clumps = drift(rate=51)   # the water comes down in gobs
    # three sizes of bubble: lowest f/Hz, highest f/Hz, mean cycles of ringing, spread/dB, gain
    kinds = [(lowest_hz, 1100, 22, 4, gurgle), (1050, 3800, 55, 5.5, fizz), (3500, 17000, 24, 5.5, spray)]
    out = 0
    for low_hz, high_hz, cycles, spread_db, level in kinds:
        size_rate = rate * (high_hz / 9000) ** .8   # small bubbles outnumber big ones
        cloud = grains(span, size_rate, low_hz, high_hz, cycles, spread_db, lead_ms, scatter_ms=0.055)
        wash = from_db(foam_db) * rms_one(band(foam_noise(lead_ms), low_hz, high_hz))
        depth_db = clump_db + thin_clump_db * (1 - flow)
        gobs = from_db(depth_db * (clumps + drift(rate=74)))
        gobs /= np.sqrt(uniform_filter1d(gobs ** 2, size=13000))   # keeps the slow level unchanged
        water = rms_one(colour(cloud / crowding + wash * inside, spectrum))
        out = out + level * gobs * water * crowding
    plinks = grains(span, per_s=150, low_hz=900, high_hz=3120, cycles=90, spread_db=5.5,
                    lead_ms=lead_ms, scatter_ms=0.082, rise=0.05)   # single drops ring out clearly
    return (out + from_db(plink_db) * fizz * plinks) * from_db(-2.0) * panned(pan_db)


def streams():
    """Air entrainment by run-off from the raised pole: big bubbles stop first, fine spray lasts."""
    out = 0
    for s, length, gurgle_db, bubble_db, spray_db, hold, lead_ms, pan_db in LIFTS:
        course = np.array(STREAM_COURSE) * [1, hold, 1, 1]
        out = out + falling_water(s, length, (gurgle_db, bubble_db, spray_db), course, STREAM_COLOUR,
                                  DRIPS_PER_S, lead_ms, pan_db, lowest_hz=384, foam_db=STREAM_FOAM_DB,
                                  clump_db=1.5, thin_clump_db=2.3, plink_db=-3.5)
    return out


def trickles():
    """Sparse bubble resonance: thin threads of water tinkle at unequal levels, with a little spray."""
    flow = sum(from_db(db) * swell(s, hold, rise, TRICKLE_FALL_DB_PER_S) for s, hold, db, rise in TRICKLES)
    tinkle = grains((2, 9), per_s=520, low_hz=983, high_hz=5790, cycles=58, spread_db=3.5,
                    lead_ms=0.31, rise=0.04)
    spray = grains((2, 9), per_s=500, low_hz=4400, high_hz=15500, cycles=31, spread_db=3.0, lead_ms=0.305)
    return flow * (colour(tinkle, [(1700, -7.5), (3000, -5.5), (5200, -9.5)]) + from_db(-13.0) * spray)


def drops(t60=0.0098, tail_db=-20, tail_t60=0.053, size=2000):
    """Impact and resonance: each drop ticks on the surface and traps one tiny ringing bubble."""
    out, t = np.zeros((2, N)), TIME[:size]
    for s, db, hz in DROPS:
        tick = pair(0.17, size) * (from_db(-60 * t / t60) + from_db(tail_db - 60 * t / tail_t60))
        ping = np.sin(2 * np.pi * hz * t) * from_db(-60 * t * hz / 70)   # 60 dB down in 70 cycles
        drop = peak_one(band(tick, hz / 1.31, hz * 1.44)) + from_db(-7.0) * peak_one(ping)
        add(out, s, from_db(db - 7.5) * panned(pan_db=6.5) * peak_one(left_leads(drop, lead_ms=0.18)))
    return out


def swirl():
    """Low resonance of large bubbles swelling and fading in the pole's wake, smaller ones gurgling among them."""
    churning = sum(from_db(db) * swell(s, 0, SWIRL_RISE_DB_PER_S, SWIRL_FALL_DB_PER_S) for s, db in SWIRLS)
    eddies = grains((3.5, 8.5), per_s=310, low_hz=110.6, high_hz=469, cycles=24, spread_db=0.0,
                    lead_ms=0, scatter_ms=0.045, rise=0.11)
    gurgle = grains((3.5, 8.5), per_s=120, low_hz=442, high_hz=1707, cycles=62, spread_db=3.0, lead_ms=0.27)
    return churning * (rms_one(colour(eddies, SWIRL_COLOUR)) * eddies.std() + from_db(5.0) * gurgle)


def bird():
    """Frequency modulation of a pure tone: thin whistles that arch and sink a little."""
    out = np.zeros((2, N))
    for s, length, hz, db in WHISTLES:
        u = np.linspace(0, 1, int(length * SR))
        pitch = hz * (1 - 0.14 * (u - .42) ** 2)
        whistle = np.sin(np.pi * u) * np.sin(2 * np.pi * np.cumsum(pitch) / SR)
        add(out, s, from_db(db) * peak_one(whistle))
    return out


def slaps(size=26000, count=4):
    """Impact on an air cushion: the pole smacks the lake, the hull rings, the cavity gulps shut and rebounds."""
    out, t = np.zeros((2, N)), TIME[:size]
    for s, db, hz, lead_ms in SLAPS:
        ring = hull_ring(SLAP_THIN_HZ, SR / 2, size)
        smack = np.sin(2 * np.pi * hz * t) * from_db(-60 * t * hz / 22)   # 60 dB down in 22 cycles
        crack = burst(SLAP_COLOUR, SLAP_T60, size=size)
        blow = smack + from_db(-9.5) * crack + from_db(-11.5) * ring
        blow = left_leads(blow * (1 - np.exp(-t / 0.00037)), lead_ms)
        add(out, s, from_db(db) * panned(SLAP_PAN_DB) * peak_one(blow))
    spit_colour = [(1500, -28), (4700, -2), (6600, -11), (15000, -14)]
    for s, db in GULPS:
        for k in range(count):
            gulp = burst(GULP_COLOUR, SLAP_T60, tilt_db=-1.5 * k, length=2.6, attack_s=0.0091)
            add(out, s + k * REBOUND_S, from_db(db - k * REBOUND_LOSS_DB) * gulp)
        add(out, s, from_db(GULP_SPIT_DB) * burst(spit_colour, SLAP_T60, length=1.26, attack_s=0.03))
    return out


def cavities(size=9000):
    """Cavity resonance: the hollow behind the pole rings unevenly and drops in pitch as it widens."""
    out, t = np.zeros((2, N)), TIME[:size]
    for s, db, start_hz, t60 in CAVITIES:
        pitch = CAVITY_OPEN_HZ + (start_hz - CAVITY_OPEN_HZ) * np.exp(-t / CAVITY_WIDENS_S)
        pitch = pitch * (1 + 0.022 * drift(rate=160)[:size])
        level = from_db(2.2 * drift(rate=140)[:size] - 60 * t / t60) * (1 - np.exp(-t / 0.0015))
        tone = peak_one(level * np.sin(2 * np.pi * np.cumsum(pitch) / SR))
        add(out, s, from_db(db) * panned(SLAP_PAN_DB) * tone)
    return out


def snaps(t60=0.0042, tail_db=-21, tail_t60=0.043, size=3000):
    """Two-stage decay: very short bright cracks of water with a faint tail from the boat."""
    out, t = np.zeros((2, N)), TIME[:size]
    for s, db, hz in SNAPS:
        decay = from_db(-60 * t / t60) + from_db(tail_db - 60 * t / tail_t60)
        crack = pair(0.17, size) * (1 - np.exp(-t / 0.0004)) * decay
        snap = band(crack, hz / 1.07, hz * 1.08) + from_db(-7.0) * band(crack, 2000, 22000)
        add(out, s, from_db(db - 7.5) * peak_one(snap))
    return out


def shower():
    """Air entrainment by the slap's spray, which rains down further ahead, swelling fast and thinning slowly."""
    return falling_water(SHOWER_S, SHOWER_LENGTH_S, SHOWER_DB, SHOWER_COURSE, SHOWER_COLOUR,
                         SHOWER_DROPS_PER_S, lead_ms=0.1, pan_db=0.0, lowest_hz=208.5,
                         foam_db=SHOWER_FOAM_DB, clump_db=0.55, thin_clump_db=0.0, plink_db=SHOWER_PLINK_DB)


def foam():
    """Bursting films: the foam left by the shower fizzes faintly, with sparser pops of larger bubbles."""
    s = SHOWER_S + SHOWER_LENGTH_S
    span = (s - .3, s + 1.2)
    pops = grains(span, FOAM_POPS_PER_S, low_hz=2210, high_hz=12200, cycles=45, spread_db=7.0,
                  lead_ms=0.256, rise=0.089)
    fizz = grains(span, per_s=4400, low_hz=2400, high_hz=16500, cycles=21, spread_db=3.0, lead_ms=0.235)
    course = swell(s, FOAM_S, ONSET_DB_PER_S, DRY_UP_DB_PER_S)
    return from_db(FOAM_DB) * course * (from_db(-6.0) * pops + from_db(1.5) * fizz) * panned(pan_db=1.5)


def scene():
    """Linear superposition: the pole streams to the left of the boat; the shower falls further ahead."""
    shore = surroundings() + whine() + bird()
    pole = knocks() + scrape() + slaps() + cavities() + snaps()
    water = lapping() + pockets() + streams() + trickles() + drops() + swirl() + shower() + foam()
    return shore + pole + water


def record(dry):
    """Saturation and band limiting: the highest peaks are rounded and the top is cut."""
    rounded = 1.216 * np.tanh(dry / 1.395)
    return signal.sosfilt(signal.ellip(10, .2, 80, CUTOFF_HZ, fs=SR, output="sos"), rounded)


dry = scene()
out = record(dry)
bounce(out)
```